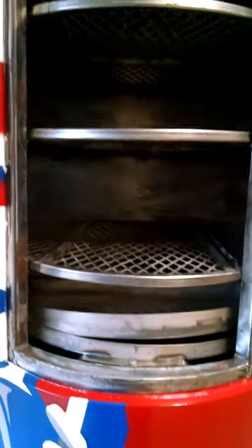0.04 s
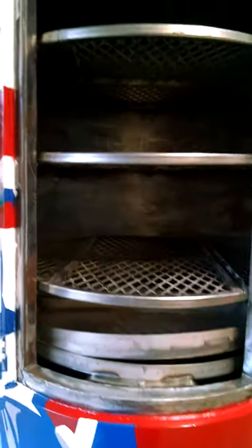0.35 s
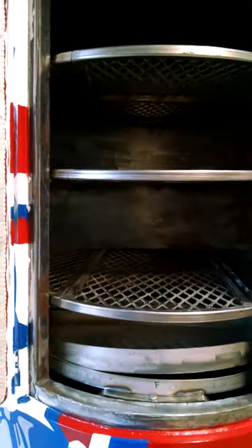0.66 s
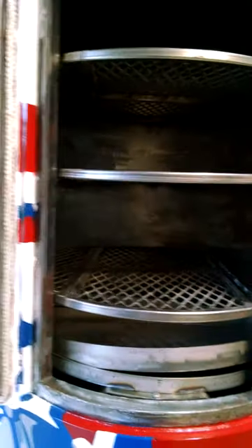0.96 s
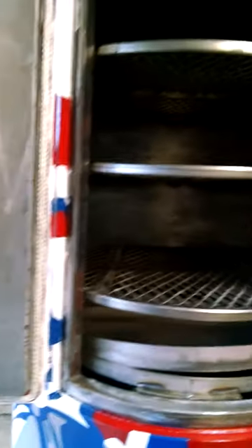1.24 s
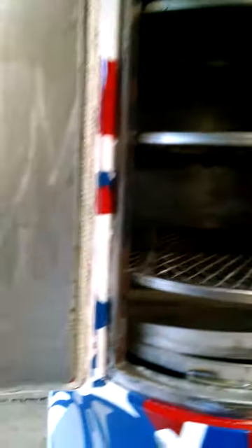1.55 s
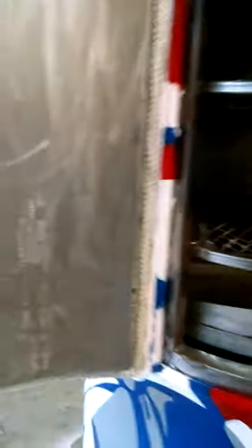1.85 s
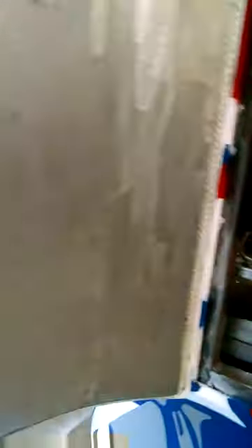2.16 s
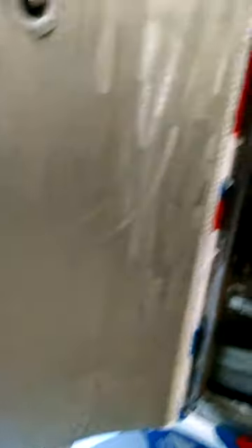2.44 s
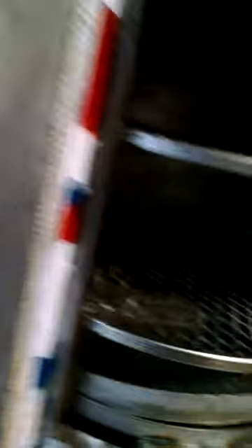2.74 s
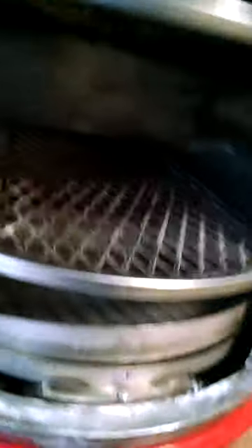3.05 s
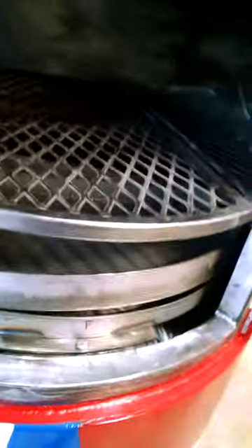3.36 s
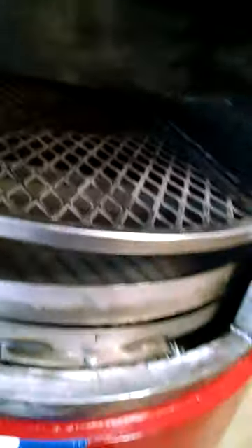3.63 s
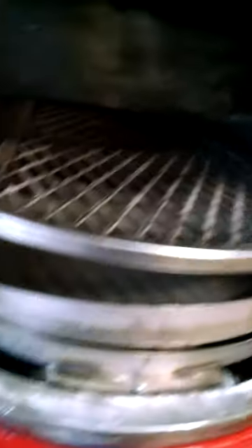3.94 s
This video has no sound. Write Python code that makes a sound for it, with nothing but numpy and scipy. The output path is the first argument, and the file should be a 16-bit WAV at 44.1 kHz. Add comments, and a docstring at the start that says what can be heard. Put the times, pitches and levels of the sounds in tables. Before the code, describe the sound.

A steel smoker door bangs shut close by at about 3 seconds, with a hollow boom, a brief scrape and a ringing rattle. Before that there is only a steady fan-like rush, joined from 2.4 seconds by a faint hinge groan and a brushing hiss. Around 3.4 seconds come a lighter clatter and a second groan, then small rack ticks and two soft bumps by 4 seconds.

```python
"""The steel door of a barrel smoker bangs shut, scrapes and rattles: the air in the drum booms and
the sheet steel rings. Just before, the door swings with a faint hinge groan and a brushing hiss.
A tiny bright click, a second groan, soft bumps and rack ticks follow, over a steady fan-like rush.
A close phone with two microphone ports turns itself down at the bang and recovers slowly."""
import sys
import numpy as np
from scipy import signal
from scipy.fft import rfft, irfft
from scipy.io import wavfile
from scipy.ndimage import uniform_filter1d

SR = 44100
rng = np.random.default_rng(int(sys.argv[2]) if len(sys.argv) > 2 else 0)


def log_audio(samples):
    """Write samples as a 16-bit WAV file to the path given in sys.argv[1]."""
    # one column per channel
    frames = np.atleast_2d(samples).T
    # limit to full scale, then quantise
    limited = np.clip(frames, -1, 1)
    pcm = np.round(limited * 32767).astype(np.int16)
    wavfile.write(sys.argv[1], SR, pcm)


N = 176400  # 4 seconds

# Each time the door hits its frame:
# start_s, clatter_db, treble_tilt_db_per_octave, boom_db, ring_db, place (0 rim to 1 latch)
DOOR_BLOWS = [(3.0096, -9.5, -3, -17.5, -9.5, .05), (3.0172, -5.5, 0, 0, 0, .05),
              (3.0449, -15.5, 1.5, -10, -13, .5), (3.064, -13, 0, -22, -11, .6),
              (3.0872, -6.5, 0, 2.5, -1, 0.99), (3.0993, -14, -0.5, -13, -16, .9),
              (3.1517, -15, -8, -12.5, -14, 0.74), (3.1844, -21.5, -3, -15, -14, .5),
              (3.424, -20, -2, -16.5, -15, 0.47), (3.433, -16.5, -5.5, -13.5, -17, 0.34),
              (3.445, -19.5, -3.5, -12, -25, .3)]
# Notes of the air in the drum: pitch_hz, level_db, decay_s (the time to fade by 60 dB)
DRUM_NOTES = [(87.7, -16.5, 0.64), (102.34, -8, 0.32), (106.5, 0.5, 0.37), (166.3, -12.5, 0.4)]
# Notes of the steel door and shell: pitch_hz, rim_hit_db, latch_hit_db, decay_s
STEEL_NOTES = [(260, -7, -11, .3), (294, -5, -11, .4), (350, 2, -11, .16), (368, 1, -5, .33),
               (386, -4, -1, .36), (484, -8, 2, .22), (596, -8, -3, .37), (745, -11, -15, .5),
               (782, -14, -6, .3), (884, 8, -12, .12), (899.5, -1, 2.5, .58), (926, -8, -6, .28),
               (955, -10, 1, .33), (1037, -3, -5, .42), (1195, -6, -3, .35), (1418, -16, -13, .36),
               (1975, -4, -8, .3), (2842, -16, -13, .38), (3262, -15, -9, .48), (3348, -16, -12, .34),
               (3429, -16, -13, .35), (3946, -19, -16, .38), (4198, -18, -16, .65), (4292, -16, -13, .3),
               (4336, -14, -9, .3), (4592, -20, -16, .32), (6800, -15, -24, .18), (7140, -18, -21, .2)]
# Crowded overtones of the sheet steel: pitch_hz, level_db, decay_s
CLATTER_SPECTRUM = [(50.6, -27, .2), (131, -0.5, 0.38), (233, -3, 0.3), (380, 2.5, 0.35), (606, -2, 0.21),
                    (890, -2, 0.42), (1310, -12, 0.52), (1940, -11, 0.28), (3050, -10, 0.39),
                    (4170, -17, 0.44), (7000, -18, 0.16), (10000, -23.5, 0.34), (14900, -31.5, 0.31)]
# Tones of the door edge sliding on the frame: pitch_hz, level_db
SQUEAL_TONES = [(1527, -3), (1650, -5), (1858, 0), (2060, -5)]
# Groans of the hinge: start_s, length_s, pitch_hz, level_db
HINGE_GROANS = [(2.417, 0.47, 300.6, -37), (3.421, 0.31, 290.5, -32)]
# The brushing hiss, from low to high: pitch_hz, level_db
BRUSH_SPECTRUM = [(1000, -24.5), (4000, -4), (7000, -1.5), (10000, 2.5), (15000, 2.5)]
# A tiny, bright click just after the bang, then three ticks of the racks:
# start_s, ring_db, pitch_hz, width_hz, snap_db
LIGHT_TICKS = [(3.206, -39, 3800, 900, -28), (3.5475, -27.5, 3800, 420, -28), (3.741, -37, 3150, 900, -42),
               (3.7805, -31, 3500, 1100, -37)]
# Soft low bumps: start_s, level_db
SOFT_BUMPS = [(3.759, -26.5), (3.94, -27.5)]
# The rush of air, from low to high: pitch_hz, level_db
RUSH_SPECTRUM = [(25, -26), (45, -17), (60, -6.5), (76, 6), (92, -15.5), (112, -5), (160, -3.5),
                 (220, -0.5), (300, -3.5), (450, -6), (600, -6), (800, -3.5), (1100, -5), (1500, -12.5),
                 (2000, -17.5), (2700, -18), (3700, -19.5), (5000, -21.5), (7000, -23), (10000, -25),
                 (15000, -30)]
# Faint tones in the rush: pitch_hz, level_db
HUM_TONES = [(166, -51.5), (195, -53), (227, -48.5)]
# How alike the two ports sound (0 unrelated, 1 fully alike):
# pitch_hz, rush_likeness, blow_likeness, left_minus_right_db
MIC_PORTS = [(80.5, 0.66, 1, -5.5), (196, 0.69, 0.66, -4.5), (407, 0.26, 0.17, -0.5), (720, 0.86, 0.5, 0.5),
             (1150, 0.96, 0.93, 0), (2360, 1, 0.92, 0), (3830, 0.65, 0.17, 1), (5860, 0.49, 0.86, .5),
             (8700, 0.58, 0.14, -0.5), (15000, 0.3, 1, 1)]
RUSH_LIKENESS, BLOW_LIKENESS, BALANCE = 1, 2, 3  # its column numbers

DRUM_DB, DRUM_RISE_S = -2, 0.0068
STEEL_DB, STEEL_TILT_SHARE = -14.5, 0.6  # the notes get only part of a blow's treble tilt
CLATTER_RISE_S, CRACK_DB, CRACK_S = 0.0028, -9.5, 0.004
OVERTONE_GAP_HZ, OVERTONE_SPREAD_DB = 20, 4
SQUEAL_DB, SQUEAL_WAVER_SHARE, SQUEAL_LAG_RADIANS = -13.5, 0.0042, 2.33
GRIT_DB, GRIT_HZ, GRIT_WIDTH_HZ = -23, 5500, 11000
SQUEAL_S, GRIT_S = (3.012, 3.045, 3.136), (3.05, 3.095, 3.16)  # start, peak, end
GROAN_WAVER_SHARE, GROAN_FLUTTER_DB = 0.0064, 1.5
BRUSH_DB, BRUSH_S = -35, (2.5, 2.872, 2.99)  # start, peak, end
TICK_DECAY_S, TICK_WIDTH_HZ, TICK_TAIL_DB, TICK_TAIL_S = 0.042, 1000, -13.5, 0.3
TICK_OVERTONE_RATIO, TICK_OVERTONE_DB, SNAP_DECAY_S, SNAP_HZ = 1.58, -10, 0.019, 6000
BUMP_HZ, BUMP_RISE_S, BUMP_DECAY_S = 82.4, 0.013, 0.34
RUSH_DB, RUSH_WAVER_DB, HUM_WIDTH_HZ = -33.5, 0.85, 9.7
SHIELD_DB, SHIELD_S = -2, (2.73, 2.95)  # start, full
HOLLOW_DB, HOLLOW_HZ, HOLLOW_WIDTH_HZ = -35.5, 327, 340
HOLLOW_S = (3.1, 3.45, 3.75, 4.1)  # start, full, fading, end
ROOM_DB, ROOM_DECAY_S, ROOM_TOP_HZ, DOOR_LOW_HZ = -27, 1.1, 700, 64
PORT_LAG_S, PORT_SKEW_HZ, MIC_TOP_HZ = 0.000392, 7500, 15350
LIMIT_DB, SENSE_S, RECOVER_DB_PER_S, LOOK_AHEAD_S = -11.5, 0.0056, 7, 0.0029


def drum_boom():
    """Each blow of the door pushes the air in the drum, which swells into a few low notes."""
    boom = sum(undb(boom_db) * ring(DRUM_NOTES, since(start), DRUM_RISE_S)
               for start, _, _, boom_db, _, _ in DOOR_BLOWS)
    return undb(DRUM_DB) * boom


def steel_ring():
    """Each blow adds energy to the steel's own notes; where it lands decides which ring most."""
    starts, _, tilt_db, _, ring_db, place = np.array(DOOR_BLOWS).T
    steel = 0
    for hz, rim_db, latch_db, decay_s in STEEL_NOTES:
        treble_db = STEEL_TILT_SHARE * tilt_db * np.log2(max(hz / 400, 1))
        place_db = np.interp(place, [0, 1], [rim_db, latch_db])
        kicks = np.zeros(N)
        kicks[(starts * SR).astype(int)] = undb(ring_db + treble_db + place_db) ** 2
        energy = signal.lfilter([1], [1, -fade(2 / SR, decay_s)], kicks)  # each kick leaks away
        steel = steel + np.sqrt(energy) * np.sin(2 * np.pi * (hz * since(0) + rng.random()))
    return undb(STEEL_DB) * steel


def clatter():
    """Each blow cracks, then fades into the crowded, uneven overtones of the same steel sheet."""
    t, hz = np.arange(SR) / SR, np.arange(SR // 2 + 1)
    grid_hz = np.arange(0, SR / 2, OVERTONE_GAP_HZ)
    peaks = np.interp(hz, grid_hz, rng.standard_normal(len(grid_hz)))
    uneven_db = OVERTONE_SPREAD_DB * peaks * hz / (hz + 1000)
    colour = undb(curve(hz, CLATTER_SPECTRUM) + uneven_db)
    colour = colour / np.sqrt(np.mean(colour ** 2))
    centres_hz = 50 * 2 ** np.arange(0, 8.6, .5)  # half-octave bands, each fading at its own speed
    bands = [np.interp(hz, centres_hz, row) for row in np.eye(len(centres_hz))]
    attack = (1 - np.exp(-t / CLATTER_RISE_S)) * (1 + undb(CRACK_DB) * np.exp(-t / CRACK_S))
    decays = [attack * fade(t, decay_s) for decay_s in curve(centres_hz, CLATTER_SPECTRUM, column=2)]
    octaves = np.log2(np.maximum(hz / 400, 1))
    out = np.zeros((2, N + SR))
    for start, db, tilt_db, _, _, _ in DOOR_BLOWS:
        i = int(start * SR)
        burst = rfft(rng.standard_normal((2, SR))) * colour * undb(db + tilt_db * octaves)
        out[:, i:i + SR] += sum(irfft(burst * share) * decay for share, decay in zip(bands, decays))
    return ports(out[:, :N], BLOW_LIKENESS)


def scrape():
    """After the first slam the door edge squeals along the frame and grinds into the latch."""
    t, port_lag = since(0), np.array([[0], [SQUEAL_LAG_RADIANS]])
    squeal = sum(undb(SQUEAL_DB + db) * np.sin(wavering_phase(hz, SQUEAL_WAVER_SHARE, 60) - port_lag)
                 for hz, db in SQUEAL_TONES)
    grit = ports(band(GRIT_HZ, GRIT_WIDTH_HZ), BLOW_LIKENESS) * undb(GRIT_DB - wander(400))
    return squeal * np.interp(t, SQUEAL_S, [0, 1, 0]) + grit * np.interp(t, GRIT_S, [0, 1, 0])


def hinge():
    """The hinge groans on one unsteady note each way."""
    out = 0
    for start, length, hz, db in HINGE_GROANS:
        progress = np.minimum(since(start) / length, 1)
        swell = np.sqrt(np.maximum(np.sin(np.pi * progress), 0))
        level = undb(db + GROAN_FLUTTER_DB * wander(20))
        out = out + level * swell * np.sin(wavering_phase(hz, GROAN_WAVER_SHARE, 25.3))
    return out


def brush():
    """Something brushes along with a hiss just before the bang."""
    hiss = noise(undb(curve(frequencies(), BRUSH_SPECTRUM)))
    swell = np.interp(since(0), BRUSH_S, [0, 1, 0]) ** 2
    return undb(BRUSH_DB) * ports(hiss * swell, RUSH_LIKENESS)


def ticks():
    """Light clicks and ticks: each is a snap, a short bright ring and a faint tail."""
    out, f = 0, frequencies()
    for start, ring_db, hz, width_hz, snap_db in LIGHT_TICKS:
        t = since(start)
        ping = band(hz, width_hz) + undb(TICK_OVERTONE_DB) * band(TICK_OVERTONE_RATIO * hz, TICK_WIDTH_HZ)
        tail = undb(TICK_TAIL_DB) * band(hz, TICK_WIDTH_HZ) * fade(t, TICK_TAIL_S)
        body = ping * fade(t, TICK_DECAY_S) + tail
        snap = noise(f / (f + SNAP_HZ)) * fade(t, SNAP_DECAY_S)
        out = out + (t > 0) * (undb(ring_db) * body + undb(snap_db) * snap)
    return ports(out, BLOW_LIKENESS)


def bumps():
    """Soft, dull bumps as things settle."""
    return sum(ring([(BUMP_HZ, db, BUMP_DECAY_S)], since(start), BUMP_RISE_S) for start, db in SOFT_BUMPS)


def rush():
    """Moving air: the closing door shields the phone from it, and it sounds hollow near the drum."""
    t = since(0)
    air = noise(undb(curve(frequencies(), RUSH_SPECTRUM)))
    level_db = RUSH_DB + np.interp(t, SHIELD_S, [0, SHIELD_DB]) + RUSH_WAVER_DB * wander(21)
    hollow = band(HOLLOW_HZ, HOLLOW_WIDTH_HZ) * np.interp(t, HOLLOW_S, [0, 1, 1, 0])
    return ports(undb(level_db) * air + undb(HOLLOW_DB) * hollow, RUSH_LIKENESS)


def hum():
    """Faint, unsteady tones within the moving air."""
    return ports(sum(undb(db) * band(hz, HUM_WIDTH_HZ) for hz, db in HUM_TONES), RUSH_LIKENESS)


def room(door):
    """The drum gives off little deep bass; the room adds a faint, dull echo."""
    door = signal.sosfilt(signal.butter(4, DOOR_LOW_HZ, "high", fs=SR, output="sos"), door)
    dull_noise = noise(1 / (1 + (frequencies() / ROOM_TOP_HZ) ** 2))
    echo = ports(dull_noise, RUSH_LIKENESS) * fade(since(0), ROOM_DECAY_S)
    echo = echo / np.sqrt(np.sum(echo[0] ** 2) * SR / (2 * ROOM_TOP_HZ))
    return door + undb(ROOM_DB) * signal.fftconvolve(door[:1], echo, axes=1)[:, :N]


def port_phase():
    """How far the left port's wave runs ahead, in radians; the bass stays in step."""
    return np.maximum(2 * np.pi * frequencies() * PORT_LAG_S - np.pi, 0)


def ports(pair, column):
    """Blend two unrelated sounds into a left and a right that are partly alike."""
    left, other = rfft(pair)
    phase = port_phase()
    skew = np.minimum(frequencies() / PORT_SKEW_HZ, 1) ** 2
    shift = np.cos(phase) - 1j * skew * np.sin(phase)  # a pure phase lag in the high treble
    likeness = curve(frequencies(), MIC_PORTS, column) * shift
    right = likeness * left + np.sqrt(np.maximum(1 - abs(likeness) ** 2, 0)) * other
    return irfft(np.array([left, right]), N)


def ring(notes, t, rise_s):
    """Pure tones that swell quickly after a blow and die away."""
    tones = sum(undb(db) * np.sin(2 * np.pi * hz * t) * fade(t, decay_s) for hz, db, decay_s in notes)
    return tones * (1 - np.exp(-t / rise_s))


def wavering_phase(hz, share, speed_hz):
    """The phase of a tone whose pitch drifts by a small share of itself."""
    return 2 * np.pi * np.cumsum(hz * (1 + share * wander(speed_hz))) / SR


def noise(gain):
    """Two unrelated noises of strength 1, shaped by a gain for each frequency."""
    pair = irfft(rfft(rng.standard_normal((2, N))) * gain, N)
    return pair / pair.std()


def band(hz, width_hz):
    """Noise gathered around one pitch."""
    return noise(1 / (1 + (2 * (frequencies() - hz) / width_hz) ** 2))


def wander(speed_hz):
    """A smooth random wobble, about 1 in size."""
    return noise(np.exp(-frequencies() / speed_hz))[0]


def curve(hz, table, column=1):
    """Read a table's column between its rows, with pitch counted in octaves."""
    table = np.array(table, float)
    return np.interp(np.log(np.maximum(hz, 1)), np.log(table[:, 0]), table[:, column])


def frequencies():
    """Every frequency of the spectrum, in Hz."""
    return np.arange(N // 2 + 1) * SR / N


def since(start):
    """Seconds since a moment, zero before it."""
    return np.maximum(np.arange(N) / SR - start, 0)


def fade(t, decay_s):
    """Die away by 60 dB in decay_s seconds."""
    return np.exp(-np.log(1000) * t / decay_s)


def undb(db):
    """Turn decibels into a gain to multiply by."""
    return 10 ** (np.asarray(db) / 20)


def scene():
    """All sources together; the bass is stronger at the right port."""
    left = drum_boom() + steel_ring()
    right = irfft(rfft(left) * np.exp(-1j * port_phase()), N)
    door = room(np.array([left, right]) + clatter() + scrape())
    mix = door + ticks() + bumps() + hinge() + brush() + rush() + hum()
    left_db = curve(frequencies(), MIC_PORTS, BALANCE) / 2
    return irfft(rfft(mix) * undb([left_db, -left_db]), N)


def record(dry):
    """The phone turns down at once on loud sound and creeps back up; it cuts the highest treble."""
    t = since(0)
    power = uniform_filter1d(np.mean(dry ** 2, axis=0), int(SENSE_S * SR))
    over_db = np.maximum(10 * np.log10(np.maximum(power, 1e-12)) - LIMIT_DB, 0)
    cut_db = np.maximum.accumulate(over_db + RECOVER_DB_PER_S * t) - RECOVER_DB_PER_S * t
    out = dry * undb(-np.interp(t + LOOK_AHEAD_S, t, cut_db))
    return signal.sosfilt(signal.ellip(10, .2, 80, MIC_TOP_HZ, fs=SR, output="sos"), out)


dry = scene()
out = record(dry)
log_audio(out)
```